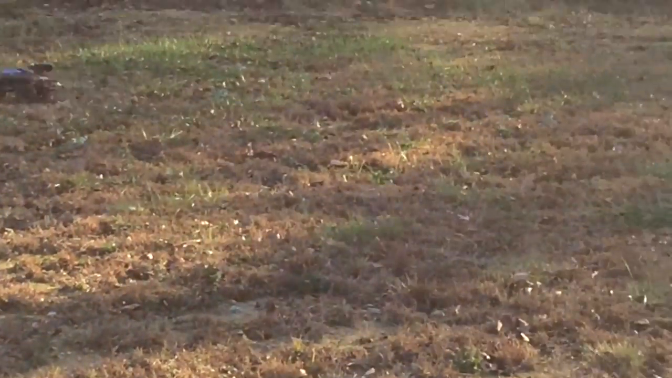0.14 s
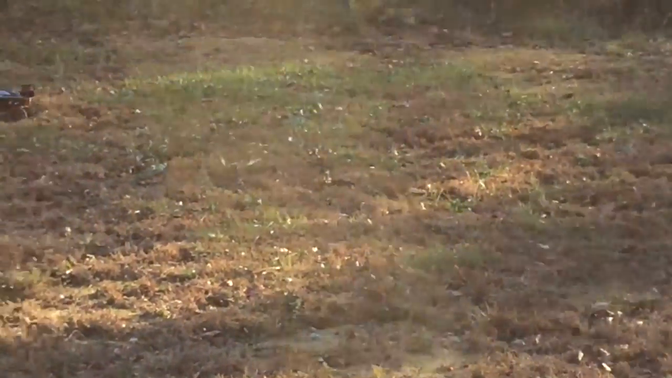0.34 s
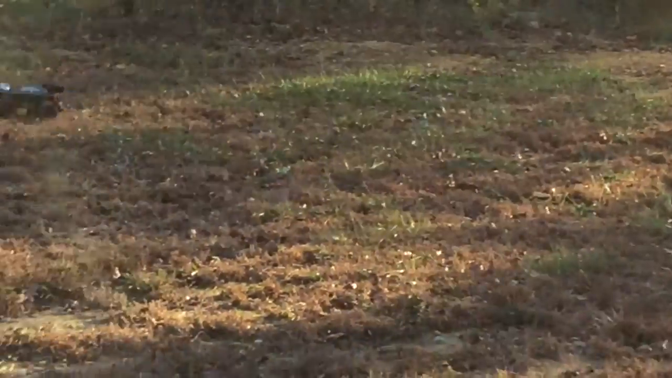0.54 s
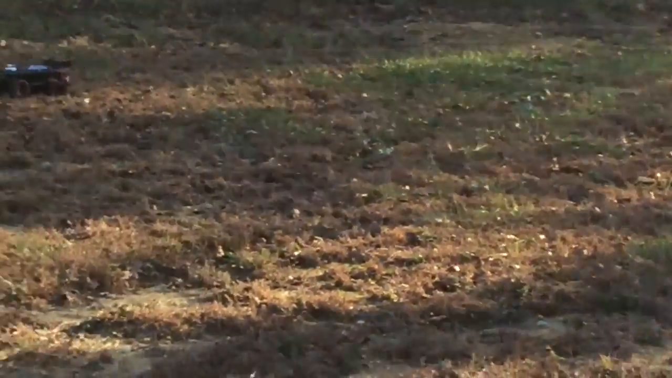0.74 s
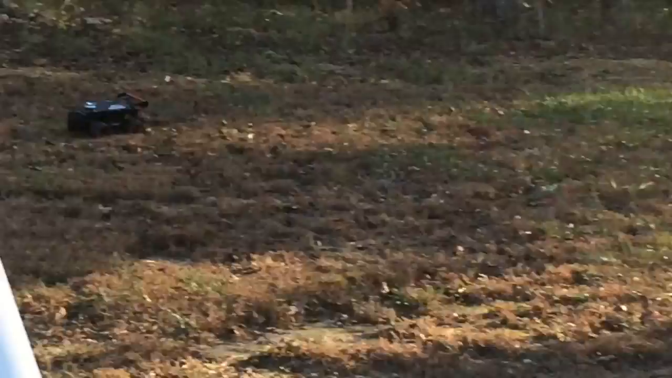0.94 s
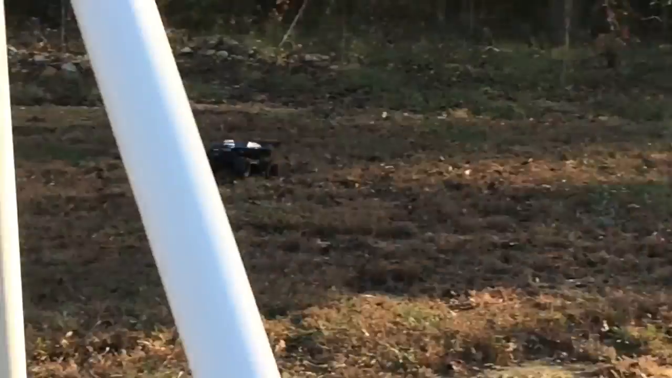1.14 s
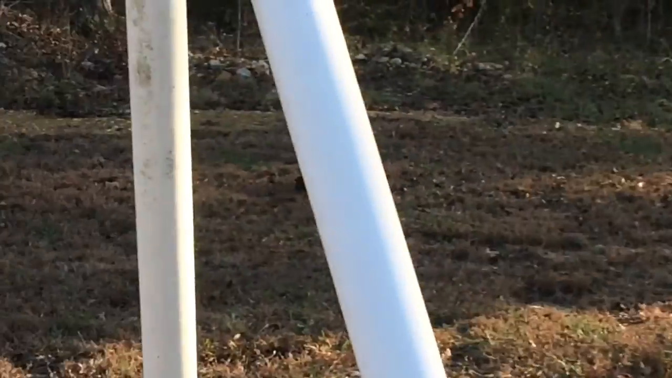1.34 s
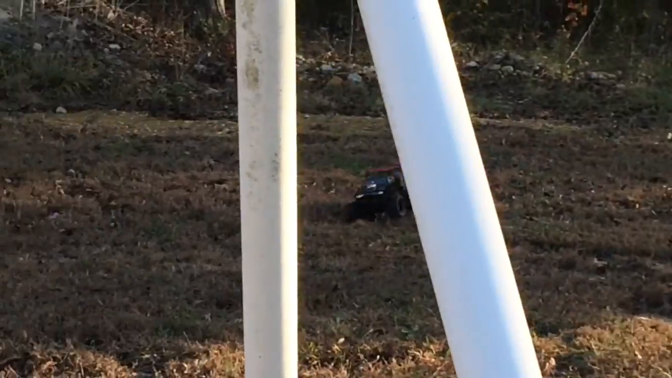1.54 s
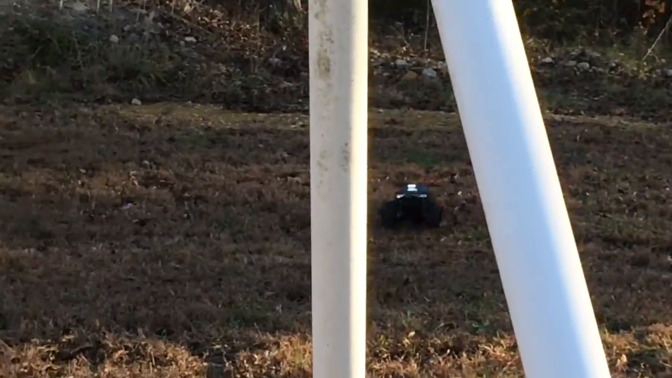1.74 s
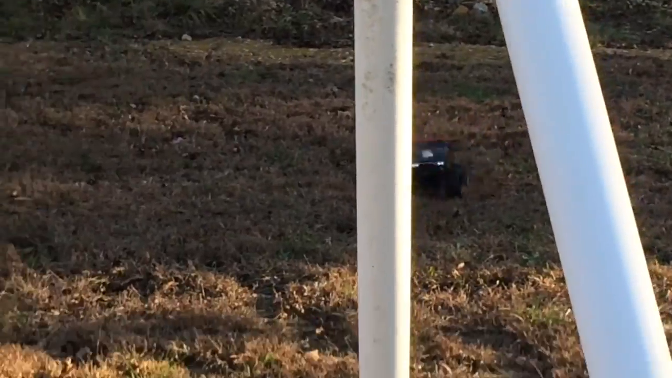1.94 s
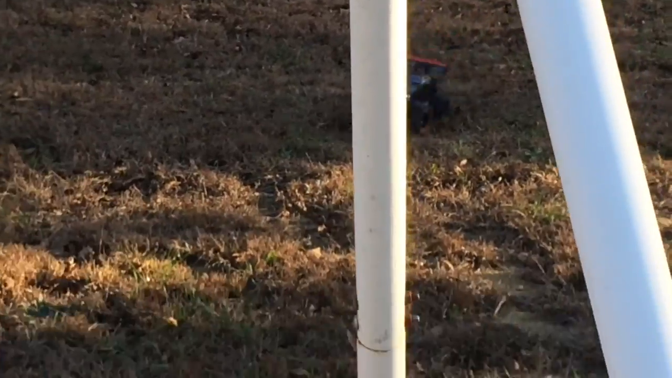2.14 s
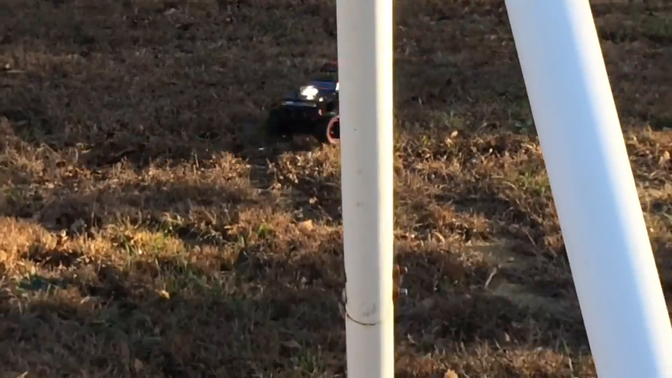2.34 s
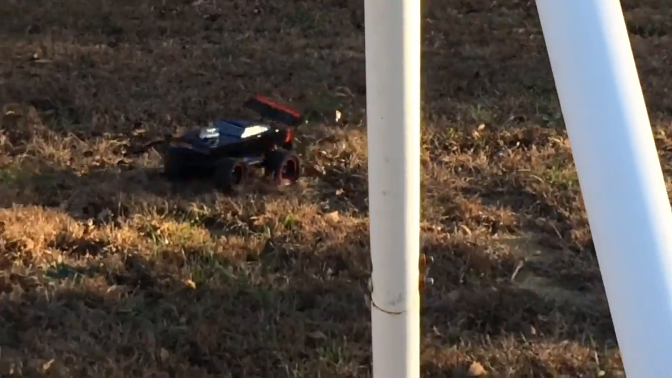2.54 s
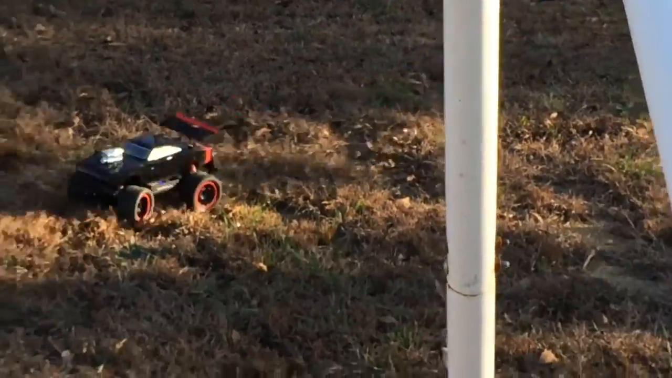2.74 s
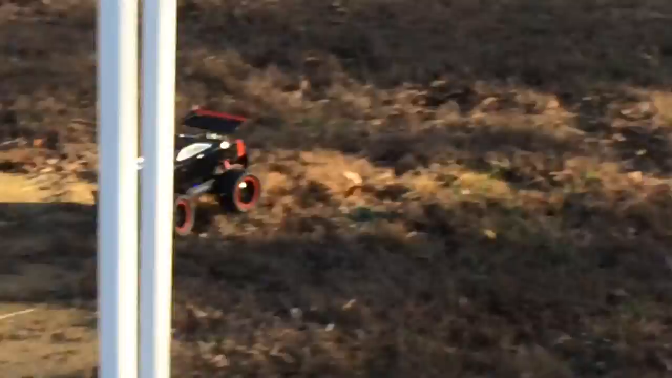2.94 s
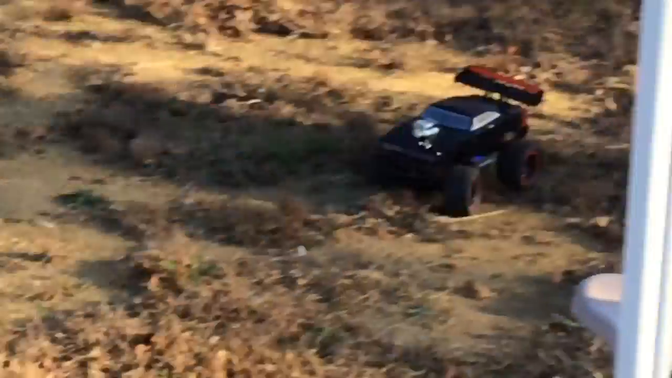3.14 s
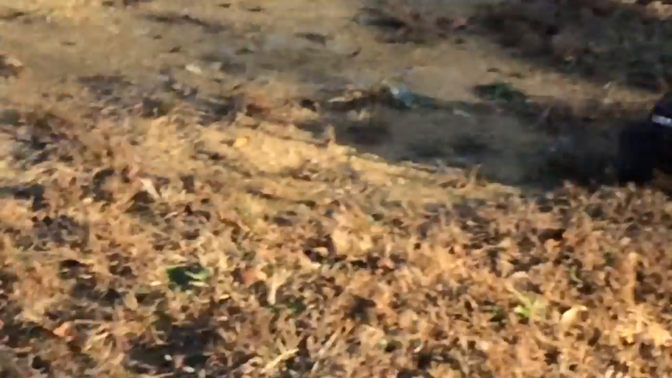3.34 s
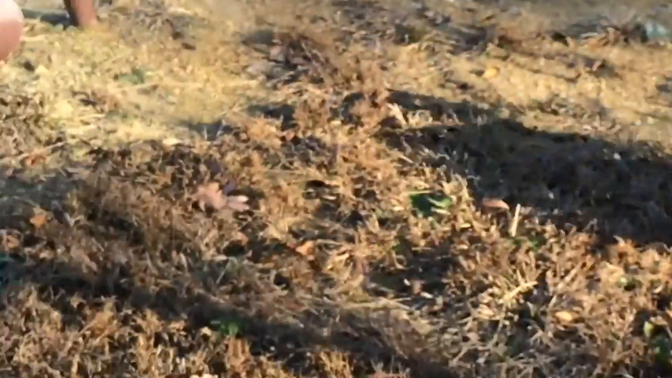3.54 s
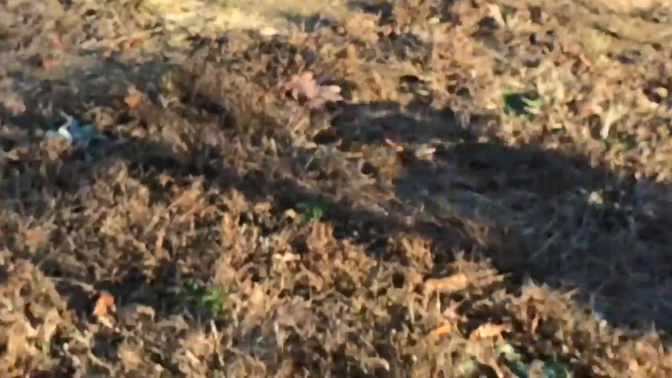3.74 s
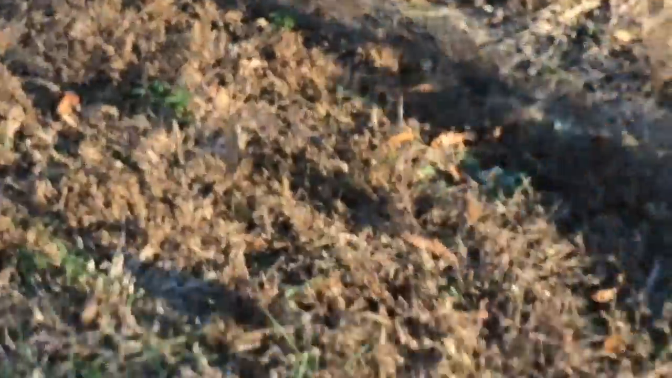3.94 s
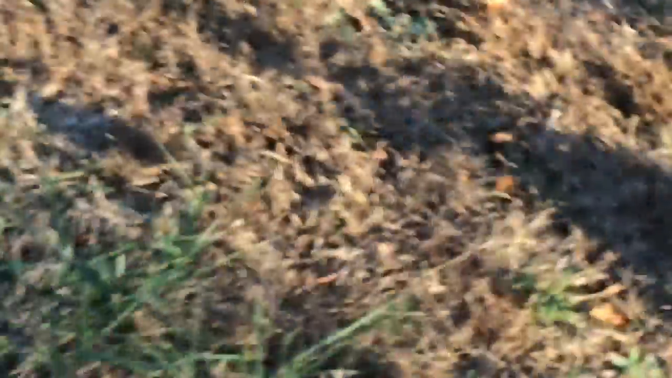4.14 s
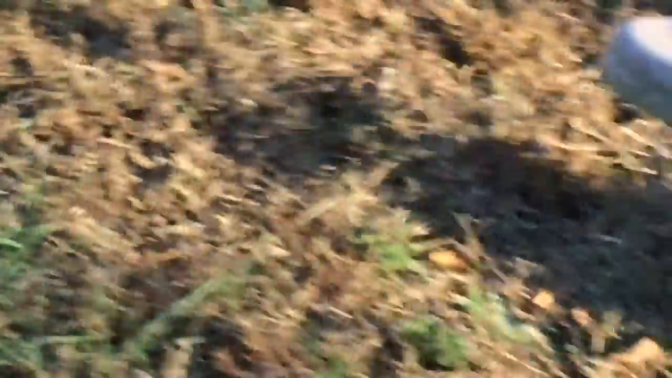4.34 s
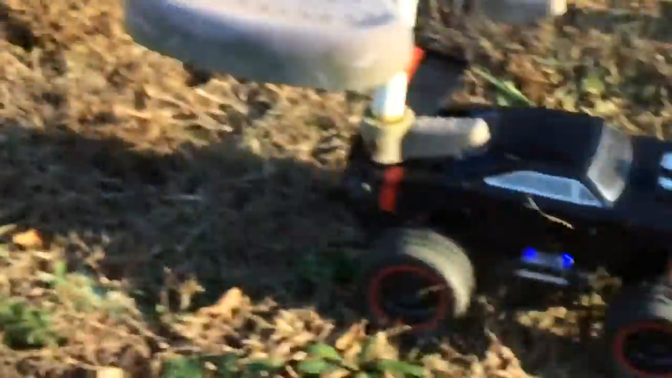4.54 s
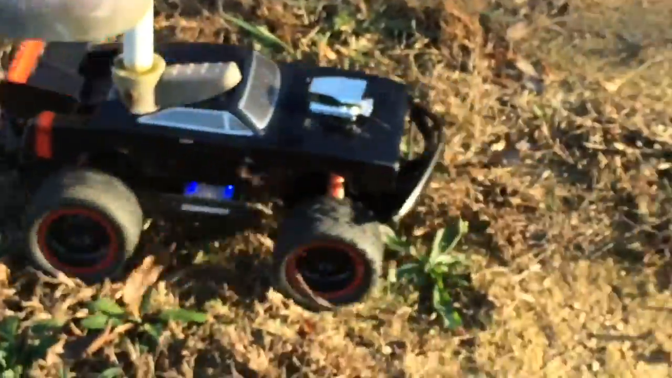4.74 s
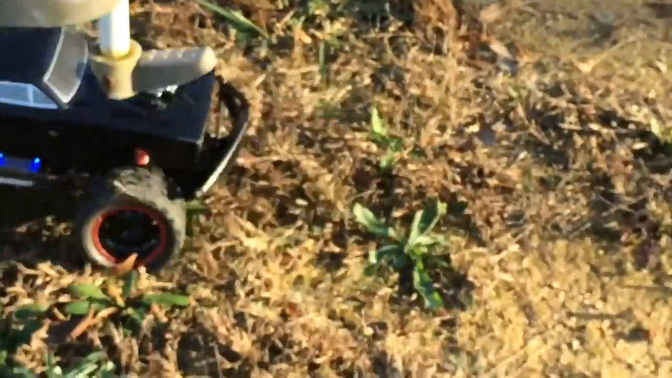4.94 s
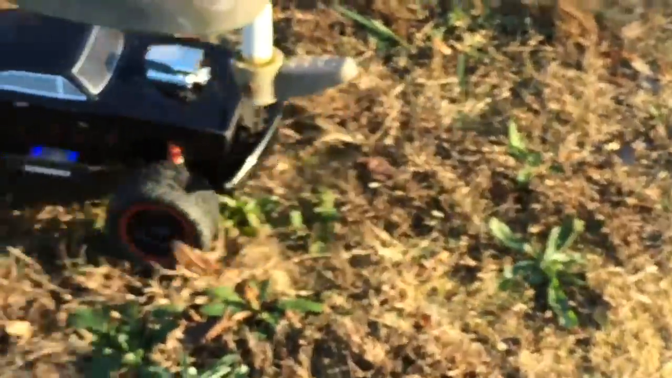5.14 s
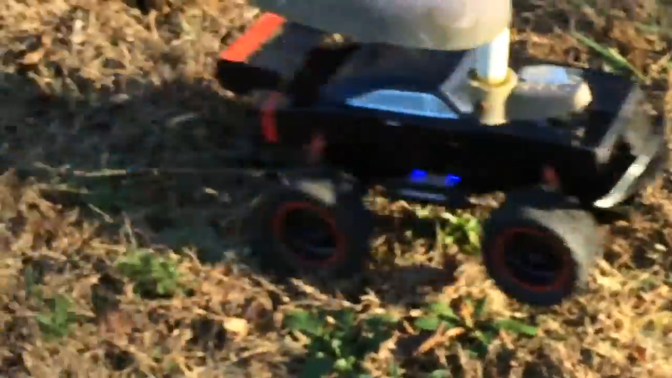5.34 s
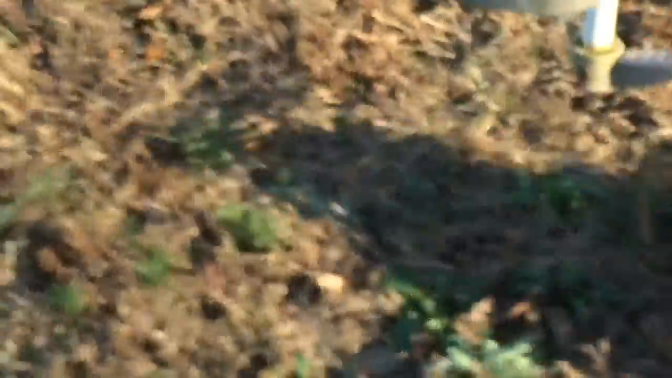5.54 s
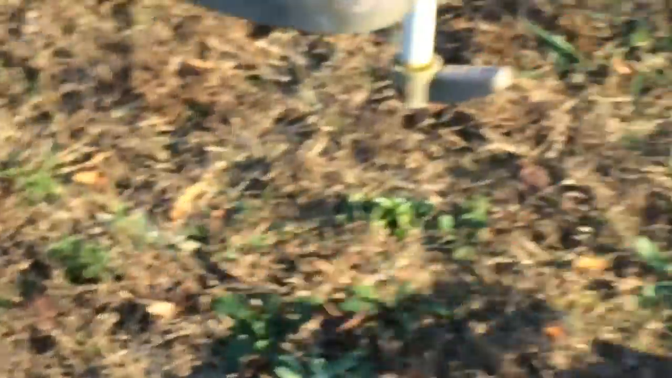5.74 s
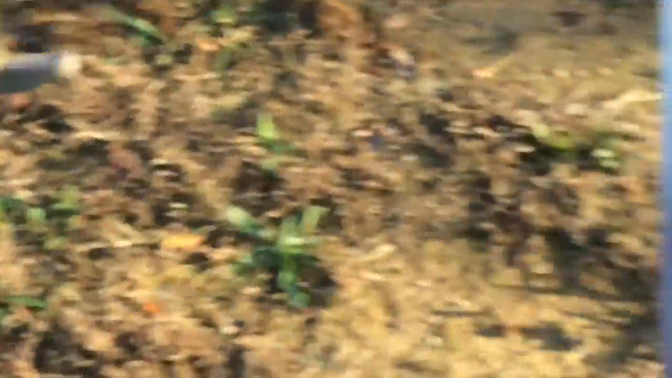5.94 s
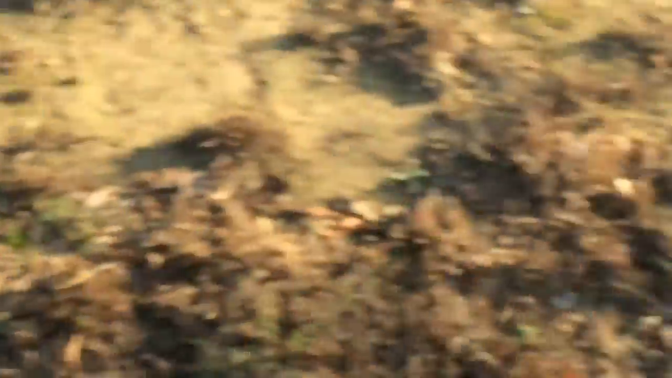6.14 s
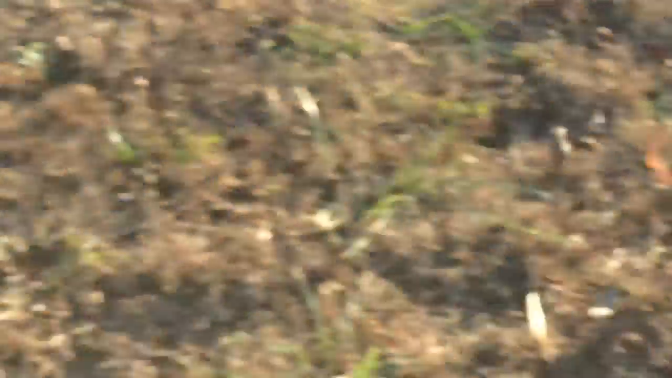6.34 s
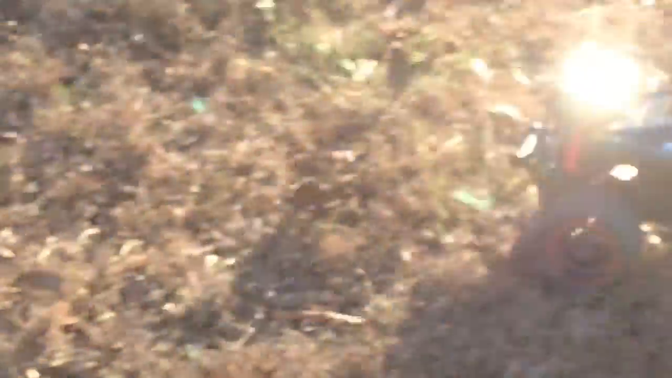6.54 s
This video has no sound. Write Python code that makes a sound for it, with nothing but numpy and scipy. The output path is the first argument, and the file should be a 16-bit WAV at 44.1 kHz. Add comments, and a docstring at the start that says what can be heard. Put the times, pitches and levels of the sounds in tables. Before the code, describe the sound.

A faint, wavering electric gear whine cuts out and restarts, then gives way to crackling grass as a toy car approaches. A brief strong whine, clatter and rolling follow. Close to the single outdoor microphone, the motor growls up and whines unevenly, stops, then bursts again louder and higher with gritty grinding. Soft yard rumble and hum lie underneath.

```python
"""A gear whine rises, sags and leaps in stop-start bursts, first far off, then close by: a battery toy
car on dry grass. The whine is tooth tones of a motor that bogs under load, over the grind of the
gearbox and dry stalks, made of coloured noise and crackle. The plastic body knocks (short hollow
rings) and clatters (gritty noise bursts). Behind lie distant yard rumble and low hum lines.
One microphone, the same signal on both channels."""
import sys
import numpy as np
from scipy import signal
from scipy.fft import rfft, irfft
from scipy.io import wavfile
from scipy.ndimage import uniform_filter1d

SR = 44100
rng = np.random.default_rng(int(sys.argv[2]) if len(sys.argv) > 2 else 0)


def int16_out(signal):
    """Quantize to a 16-bit WAV file."""
    q = np.round(np.clip(np.atleast_2d(signal).T, -1, 1) * 32767)
    wavfile.write(sys.argv[1], SR, q.astype(np.int16))


N = 290178

# Levels in the tables are settings ahead of the microphone colour.
# distant yard, spectrum shape: f/Hz, density/dB
YARD_SPECTRUM = [(15, -43), (25, -2.5), (59, -2), (156, -2.5), (228, -6), (253, -12.5), (305, -8),
                 (422, -16.5), (501, -8.5), (1500, -23), (1950, -32.5), (3300, -120)]
# distant yard, course of the rumble: t/s, level/dB
YARD_LEVEL = [(0.0, -43.5), (1.48, -41.5), (6.58, -48.5)]
# distant hum lines: f/Hz, width/Hz, level/dB, from t/s, to t/s
HUM_LINES = [(76, 12, -52, 0, 5.4), (128, 6, -48, .9, 1.4), (130, 10, -50, 4.75, 5.45),
             (156, 5, -46, 0, 2.15), (156, 8, -52, 2.25, 2.9), (315, 10, -55, 1.5, 2.0)]
# dull bumps near the microphone: t/s, relative level/dB, fall time/s
THUMPS = [(4.198, -14, 0.01), (4.239, -18, 0.048)]
# microphone colour: f/Hz, gain/dB
MIC_COLOUR = [(20, -28), (45, -2), (13500, 0), (14800, -14), (15800, -12)]
EDGE_HZ = 15700  # upper band limit

# grind of gears and tyres as the car comes, goes and stops:
# t/s, relative level/dB, treble share/dB, bass share/dB
GRIND_COURSE = [(0, -37.5, 1.5, -3), (1.451, -35, -1.2, -4), (1.68, -36, -4.5, -4.5),
                (1.85, -31.5, -5, -4.5), (2.1, -33, -3.5, -3), (2.249, -36.5, -5, -0.8), (2.45, -33, -2, 0),
                (2.9, -35, 2, -1), (3.2, -29.5, 1, 0), (3.47, -33.5, 5, 3.5), (3.6, -30, 2.5, -0.5),
                (3.655, -29, -1, -1), (3.681, -24.5, -0.5, -4), (3.74, -22, -4.5, -7),
                (3.762, -36, -1.8, 0), (4.069, -38, -5, 0), (4.29, -35, -7, 5.5), (4.345, -27, -2, 2),
                (4.55, -24.5, -2, 4.5), (4.957, -29, 0.5, 4), (5.007, -41.5, -2.5, 1.5),
                (5.23, -41.5, -3.5, 1.5), (5.332, -28.5, -8.5, -1.5), (5.43, -27.5, -5.5, -5.5),
                (5.65, -19, -5, -5.5), (5.73, -18.5, 0.5, -8.5), (5.78, -21, -10.5, -4),
                (5.85, -23, 1.5, -3.5), (5.9, -19.5, 1, -4.5), (6.06, -18, -3, -7.5), (6.106, -25, 9, -7),
                (6.14, -19.5, -5, 0), (6.18, -33.5, -1.5, 0.5), (6.47, -40, 4.5, -1.5),
                (6.58, -25, -6.5, 7)]
# colour of the grind far off: f/Hz, relative density/dB
FAR_COLOUR = [(150, -44), (250, -11), (308, 3), (420, -8), (507, -6.5), (1600, -10), (2280, -13),
              (3220, -10.5), (4240, -7.5), (6420, -10.5), (8320, -11), (9720, -12.5), (13000, -14),
              (15500, -10)]
# colour of the grind drawing near or rolling free: f/Hz, relative density/dB
COMING_COLOUR = [(150, -36.5), (250, 9), (442, -12.5), (563, -13), (809, -8), (1310, -6.5), (2020, -7.5),
                 (2900, -5.5), (4030, -8), (5600, -9), (7640, -11), (9230, -11), (12800, -13), (15500, -9)]
# colour of the grind driving close by: f/Hz, relative density/dB
CLOSE_COLOUR = [(150, -57.5), (250, -6.5), (480, -14), (900, -12), (1400, -13.5), (1950, -12.5),
                (2320, -10), (3010, -9.5), (4300, -4), (5050, -12), (5450, -14), (7200, -12), (9200, -11.5),
                (10800, -11), (13000, -14), (15500, -19.5)]
# where the car is: t/s, place (0 far, 1 nearing or rolling free, 2 close under power)
PLACE = [(1.7, 0), (2.6, 1), (4.2, 1), (4.32, 2), (4.95, 2), (5.0, 1), (5.23, 1), (5.26, 2), (6.15, 2),
         (6.19, 1)]
# gearbox case resonances: f/Hz, width/Hz, lift/dB
CASE_RESONANCES = [(778, 132, 14), (2700, 240, 0), (4240, 120, 8), (8500, 200, 5), (10730, 1150, 3)]
# scuffs of wheels and body through dry stalks swell the grind:
# t/s, lift/dB, treble change/dB, half length/s
SCUFFS = [(2.377, 4.5, -3, 0.04043), (2.701, 9, -5.5, 0.008), (2.767, 3, 0, 0.16), (2.955, 6.5, -3.5, 0.02),
          (3.145, 4, -8, 0.043), (3.242, 4.5, -4, 0.021), (3.33, 5.5, -4.5, 0.045),
          (3.406, 3.5, 0.5, 0.019), (3.54, 6, -4, 0.024), (3.91, 5, 3, 0.093), (4.032, 6, 2.5, 0.044),
          (4.123, 6.5, 0, 0.011), (4.221, 7.5, 2.5, 0.065), (5.107, 7.5, 4.5, 0.03),
          (5.273, 16.5, -6, 0.025), (5.403, 8.5, -1, 0.085), (5.557, 5.5, 4.5, 0.026),
          (5.804, 5, 6.5, 0.021), (6.275, 3, 7, 0.011), (6.396, 8.5, -1.5, 0.059)]
# the wheels hop clear of the stalks and the grind dips: t/s, level change/dB
HOPS = [(3.229, -7), (3.343, -7), (3.375, -3), (3.42, -4), (3.465, -11), (3.574, -6)]
HOP_S = .007  # half length of a hop
# bands that stand out or drop away as the car turns and the ground echoes it:
# from t/s, to t/s, f/Hz, half width/Hz, change/dB
FACING_BANDS = [(0, 2.25, 1850, 170, -7), (2.2, 2.9, 1500, 220, 4), (2.4, 3.25, 3150, 300, 4.5),
                (2.5, 3.06, 4500, 350, 5), (3.3, 3.76, 2800, 330, 5), (5.5, 5.72, 2900, 350, -4),
                (5.5, 5.68, 1750, 130, 6), (5.9, 6.06, 2200, 150, 4)]

# hollow knocks of the chassis: t/s, relative level/dB, f/Hz
KNOCKS = [(1.483, -30.5, 515.5), (2.168, -26.5, 793), (2.684, -30, 980), (2.771, -20, 790),
          (3.128, -23, 760), (3.555, -21.5, 923), (4.03, -27, 874), (4.085, -16.5, 808),
          (4.113, -29.5, 1850), (4.246, -20.5, 326), (4.463, -20, 676), (4.63, -25.5, 812),
          (4.739, -25.5, 811), (5.735, -25, 840), (6.123, -26, 1232), (6.524, -28, 843), (6.569, -28, 680)]
# clatter of body shell and stalks: t/s, relative level/dB, brightest f/Hz
CLATTER = [(2.959, -11, 4400), (3.1497, -8.5, 3370), (3.2051, -14.5, 4680), (3.2497, -10, 9110),
           (3.3524, -20, 2980), (3.3852, -11.5, 3100), (3.4323, -13.5, 2720), (3.473, -9, 3060),
           (3.669, -9.5, 2956), (3.8197, -17, 3120), (3.8658, -15.5, 3020), (3.9987, -6.5, 4000),
           (4.0327, -20, 4070), (5.471, -20, 4400), (5.7494, -7.5, 4540), (6.129, -3.5, 4970),
           (6.2729, -11, 2970)]
# single snaps of a stalk: t/s, relative level/dB, brightest f/Hz
TICKS = [(2.699, -16, 4000), (4.246, -13, 600), (5.0207, -23, 2890), (5.0406, -18.5, 6480),
         (5.1, -16.5, 7000), (5.169, -20, 9840), (5.2142, -21, 3830), (5.249, -27, 2480),
         (6.217, -16.5, 6582), (6.539, -6, 1850)]

# colour that the body gives to the whine: f/Hz, gain/dB
BODY_COLOUR = [(400, -25), (1000, -8.5), (1500, -21), (1760, -10), (2000, -12.5), (3100, -13.5),
               (4420, 3.5), (5150, -7), (5500, -46), (7550, -85), (8930, 1), (10500, -26), (13500, -38),
               (15500, -46)]
# higher multiples of the tooth rate: multiple, level/dB (odd against the whine, even against its octave)
OVERTONES = [(3, -11.5), (4, -5), (5, -12)]
TEETH = 10  # tooth-rate cycles for each turn of the shaft
# spells of throttle farther off, levels at top speed before the body colours them:
# on t/s, off t/s, first tooth rate f/Hz, top tooth rate f/Hz, spin-up time/s, whine level/dB,
# octave level/dB, lift while the load slows the motor/dB, tooth slack/rad per multiple,
# rms speed flutter (share of speed)
SPELLS = [(0, 1.62, 2855, 2823, 0.14, -48, -46, 5, .09, .008),
          (1.811, 2.14, 2976, 2855, 0.092, -37, -42, 3, 0.08, .004),
          (2.947, 3.0, 2560, 2550, 0.1166, -53.5, -26, 13, 0.1282, 0.09),
          (3.341, 3.75, 2932, 2925, 0.13, -27, -46, 3, .33, 0.022)]
# tufts and ruts that load the wheels: t/s of lowest speed, speed lost (0-1), fall/s, recovery/s,
# whine change/dB, octave change/dB
SAGS = [(.025, 0.32, 0.052, 0.1, -2, 15.5), (.09, 0.26, 0.068, 0.072, 7, 10),
        (.25, 0.2, 0.04166, 0.024, -4, 1), (.295, 0.32, 0.023, 0.012, 9.5, 12.5),
        (.6, 0.28, 0.028, 0.04, 1, 7.5), (1.036, 0.28, 0.028, 0.03, 9, 9.5),
        (1.194, .26, 0.03234, .018, 18, 12), (1.38, 0.18, 0.029, 0.035, 15, 10),
        (1.578, 0.28, 0.019, 0.028, 20, 8), (1.85, 0.14, 0.02, 0.083, 5.5, 0),
        (2.105, 0.21, 0.03, 0.046, 5.5, -8), (2.975, 0.16, 0.026, 0.33, 7, -3),
        (3.34, .08, 0.0184, 0.031, 2.74, -3), (3.465, 0.17, 0.07097, 0.05, 6, 0),
        (3.544, 0.13, 0.014, 0.024, 13.5, -10.5)]
QUICK_S = .045  # after a load that lets go faster than this, the strain in the whine eases sooner
DB_PER_OCTAVE = 9.5  # the whine grows louder with speed
BRAKE_OCTAVES_PER_S = 24  # rate of slowing that gives three quarters of the braking lift
# throttle closed: decay time of the speed, extra fade of the whine, time until it is cut
COAST_S, COAST_DB_PER_S, COAST_HEARD_S = 0.31, 380., 0.11
# two bursts close by, speed sagging and leaping with the load:
# t/s, tooth rate f/Hz, whine level/dB, octave level/dB
FIRST_BURST = [(4.251, 684, -37, -49), (4.28, 992, -56, -52), (4.312, 1136, -42, -36),
               (4.346, 1766, -45, -35), (4.388, 2460, -27.5, -32), (4.418, 2523, -24.5, -33),
               (4.441, 2261, -33, -38), (4.456, 2538, -30, -27), (4.47, 2014, -31, -21),
               (4.483, 1879, -35, -42), (4.51, 2093, -38, -23), (4.524, 2253, -33, -36),
               (4.546, 2433, -31, -35), (4.572, 2494, -27.5, -27), (4.598, 2035, -36, -20),
               (4.612, 2320, -33, -36), (4.65, 2545, -32, -34), (4.669, 2407, -24, -26),
               (4.691, 2270, -41, -32), (4.704, 2410, -31, -33), (4.728, 2464, -30.5, -34),
               (4.752, 2438, -30.5, -30), (4.766, 2240, -27, -21.5), (4.78, 2380, -31.5, -28),
               (4.846, 2456, -31, -31), (4.88, 2306, -35, -33), (4.925, 1426, -52.5, -39)]
# the second burst: t/s, tooth rate f/Hz, whine level/dB, octave level/dB
SECOND_BURST = [(5.32, 909, -56, -56), (5.33, 900, -35, -48), (5.358, 1301, -38, -37),
                (5.391, 1589, -35, -42), (5.402, 1770, -26, -27), (5.416, 1881, -31.5, -21.5),
                (5.466, 1716, -24, -28), (5.474, 1607, -40, -53.5), (5.495, 1013, -35, -51),
                (5.512, 1483, -49, -42), (5.524, 1760, -23.5, -27), (5.538, 2042, -42, -15.5),
                (5.55, 2220, -23, -20.5), (5.566, 2238, -27, -13), (5.578, 1850, -33, -31),
                (5.588, 1542, -43, -39), (5.606, 1677, -35, -35), (5.635, 2109, -38, -14),
                (5.659, 1962, -40, -22), (5.693, 2430, -34, -22), (5.712, 2665, -27, -40),
                (5.74, 2812, -27, -44), (5.75, 2428, -36, -33), (5.76, 1780, -35, -40),
                (5.774, 1714, -33, -53), (5.79, 2280, -54, -26), (5.808, 2402, -39, -30),
                (5.83, 2952, -41, -55), (5.886, 2956, -22.5, -36), (5.904, 2708, -28.5, -47),
                (5.932, 2884, -33, -34), (5.956, 2209, -31, -27), (5.986, 2464, -39, -22.5),
                (6.012, 1932, -34, -19), (6.08, 2810, -28.5, -47), (6.114, 3080, -21, -50),
                (6.14, 2886, -42, -42)]
# upper multiples of each burst, before the body colours them: third level/dB, fourth and fifth level/dB,
# treble change/dB (third above 6 kHz; minus half of it on the fourth above 6 kHz and all of the fifth),
# tooth slack/rad per multiple
BURST_OVERTONES = [(-32, -33, 0, .16), (-22, -33, -14, .1)]
BITE_HZ = 1300  # below this tooth rate the upper multiples of a burst fade


def amp(db):
    """Decibels to gain."""
    return 10 ** (np.asarray(db) / 20)


def evened(x):
    """Scales to rms 1."""
    return x / np.sqrt(np.mean(x ** 2) + 1e-20)


def read(points, hz):
    """Reads a spectrum on a log-frequency axis."""
    f, value = np.transpose(points)
    return np.interp(np.log(hz + 1), np.log(f + 1), value)


def add(mix, s, sound):
    """Mixes a sound in at s seconds."""
    part = mix[round(s * SR):][:len(sound)]
    part += sound[:len(part)]


def wobble(count, size):
    """Smooth random wander of rms 1."""
    once = uniform_filter1d(rng.standard_normal(count), size)
    return evened(uniform_filter1d(once, size))


def resonate(x, hz, width):
    """One resonance of gain 1: shifts its pitch to zero, smooths, and shifts back."""
    turn = np.exp(2j * np.pi * hz * np.arange(len(x)) / SR)
    r = np.exp(-np.pi * width / SR)
    return 2 * (turn * signal.lfilter([1 - r], [1, -r], x / turn)).real


def gate(t, start, end, size):
    """A switch from 0 to 1 and back, with edges smoothed over size steps."""
    return uniform_filter1d(1. * (t >= start) * (t <= end), size=size)


def yard(steady=10.0):
    """Far-off rumble of shaped noise, with hum lines, mostly steady tone, that come and go."""
    hz, t = np.fft.rfftfreq(N, 1 / SR), np.arange(N) / SR
    rumble = evened(irfft(rfft(rng.standard_normal(N)) * amp(read(YARD_SPECTRUM, hz)), N))
    out = amp(np.interp(t, *np.transpose(YARD_LEVEL))) * rumble
    for f, width, db, start, end in HUM_LINES:
        rough = evened(resonate(rng.standard_normal(N), f, width))
        hum = evened(steady * np.sin(2 * np.pi * f * t) + rough)
        out += amp(db) * gate(t, start, end, size=4000) * hum
    return out


def thumps():
    """Dull bumps close to the microphone: low noise with no ring."""
    out, t = np.zeros(N), np.arange(4000) / SR
    for s, db, length in THUMPS:
        push = rng.standard_normal(len(t))
        low = resonate(resonate(push, 310.0, 1000.0), 300., 2300.0)
        low = evened(low - uniform_filter1d(low, size=500))  # takes out the deepest rumble
        envelope = np.minimum(t / 0.001182, 1) * np.exp(-(t / length) ** 2)
        add(out, s, .5 * amp(db) * envelope * low)
    return out


def stalk_noise(crackle_db=5.5, crackles_per_s=2500., crackle_share=0.31):
    """Dry stalks under the car: steady noise mixed with random clicks of uneven strength."""
    strength = amp(crackle_db * np.minimum(rng.exponential(1, N), 3))
    clicks = strength * (rng.random(N) < crackles_per_s / SR) * rng.choice([-1, 1], N)
    return (1 - crackle_share) * rng.standard_normal(N) + crackle_share * evened(clicks)


def grind_level(t):
    """Level and band shares of the grind: scuffs swell it, hops off the stalks dip it."""
    s, *columns = np.transpose(GRIND_COURSE)
    level_db, treble_db, bass_db = (np.interp(t, s, c) for c in columns)
    at, lift_db, edge_db, length = np.transpose(SCUFFS)
    scuff = np.exp(-((t[:, None] - at) / length) ** 2)
    at, hop_db = np.transpose(HOPS)
    hop = np.exp(-((t[:, None] - at) / HOP_S) ** 2)
    return level_db + scuff @ lift_db + hop @ hop_db, treble_db + scuff @ edge_db, bass_db


def grind_colour(hz, t, treble_db, bass_db):
    """Spectrum of the grind over time: distance of the car, case resonances, the way it faces."""
    colour = np.outer(hz < 1500, bass_db) + np.outer(hz > 5500, treble_db)
    place = np.interp(t, *np.transpose(PLACE))
    for k, points in enumerate((FAR_COLOUR, COMING_COLOUR, CLOSE_COLOUR)):
        colour += np.outer(read(points, hz), np.maximum(1 - abs(place - k), 0))
    for f, width, db in CASE_RESONANCES:
        colour += db / (1 + (2 * (hz[:, None] - f) / width) ** 2)
    for start, end, f, width, db in FACING_BANDS:
        band = np.exp(-((hz - f) / width) ** 2)
        colour += db * np.outer(band, gate(t, start, end, size=60))
    return colour


def grind(flicker_db=1.5, patchy_db=2.5):
    """Noise and crackle of dry stalks, coloured by where the car is, flickering at random in level."""
    hz, t, z = signal.stft(stalk_noise(), SR, nperseg=256, noverlap=192)
    level_db, treble_db, bass_db = grind_level(t)
    colour = grind_colour(hz, t, treble_db, bass_db)
    patches = uniform_filter1d(rng.standard_normal(z.shape), size=2, axis=0)
    patches = evened(uniform_filter1d(patches, size=14, axis=1))
    # a random flicker moves all bands together, patches only a few
    flicker = wobble(len(t), size=7)
    z = z * amp(colour + level_db + 11.0 + flicker_db * flicker + patchy_db * patches)
    return signal.istft(z, SR, nperseg=256, noverlap=192)[1][:N]


def knocks(thud=0.78, t60=0.075, rise=0.0039):
    """Hollow chassis knocks: a short decaying ring with a broad puff of noise about its pitch."""
    out, t = np.zeros(N), np.arange(6000) / SR
    for s, db, hz in KNOCKS:
        puff = evened(resonate(rng.standard_normal(len(t)), hz, 270.0))
        ring = np.sin(2 * np.pi * hz * t) + thud * puff
        add(out, s, amp(db - 60 * t / t60) * np.minimum(t / rise, 1) * ring)
    return out


def clatter(rows, length, rise, snap, wide=0.5, grit_db=1.5):
    """Plastic or a stalk struck: a quick gritty burst of noise, brightest at one pitch, broad-edged."""
    out, t = np.zeros(N), np.arange(3000) / SR
    for s, db, hz in rows:
        grit = amp(grit_db * wobble(len(t), size=40))
        noise = evened(rng.standard_normal(len(t)) * grit)
        tone = evened(resonate(noise, hz, 520.0)) + wide * noise + snap * np.sin(2 * np.pi * hz * t)
        envelope = np.minimum(t / rise, 1) * np.exp(-(t / length) ** 2)
        add(out, s, 0.27 * amp(db) * envelope * tone)
    return out


def teeth(hz, levels_db, slack, beat=0.5, waver_db=2.5, rasp=0.3, shaft_db=-24.5):
    """Tooth tones beat 1 and 3 times a turn of an off-centre shaft, each wavering at random in level."""
    count = len(hz)
    tooth = 2 * np.pi * np.cumsum(hz) / SR
    shaft = tooth / TEETH
    out = amp(levels_db[0] + shaft_db) * np.sin(shaft)
    for k, db in enumerate(levels_db, start=1):
        level = amp(db + waver_db * wobble(count, size=400)) * (k * hz < EDGE_HZ)
        turning = np.cos(shaft + k) + np.cos(3 * shaft + wobble(count, size=200))
        uneven = 1 + beat * turning + rasp * wobble(count, size=40)
        play = slack * k * wobble(count, size=30)  # loose teeth meet a little early or late
        out += level * uneven * np.sin(k * tooth + play)
    return np.sqrt(2) * out * signal.windows.tukey(count, 600 / count)


def motor(on, off, first_hz, top_hz, spin, whine_db, octave_db, brake_db, ease=1.5, round_off=1.3):
    """Speed climbs to its top, sags under the heaviest load of the moment, and coasts down."""
    t = np.arange(on, off + COAST_HEARD_S, 1 / SR)
    loads = [row for row in SAGS if on <= row[0] <= off + .01]
    s, lost, fall, back, first_db, second_db = (c[:, None] for c in np.transpose(loads))
    near = np.exp(-np.where(t < s, (s - t) / fall, (t - s) / back) ** round_off)
    load = lost * near
    past = np.maximum(t - off, 0)
    free_hz = top_hz + (first_hz - top_hz) * np.exp(-(t - on) / spin)
    hz = free_hz * (1 - load.max(0)) * np.exp(-past / COAST_S)
    level_db = DB_PER_OCTAVE * np.log2(hz / top_hz) - COAST_DB_PER_S * past
    slowing = -np.gradient(np.log2(hz), t)  # octaves per second
    level_db += brake_db * np.tanh(slowing / BRAKE_OCTAVES_PER_S) * (t < off)
    strain = near ** np.where((t > s) & (back < QUICK_S), ease, 1.0)
    heaviest = load.argmax(0), np.arange(len(t))
    first = whine_db + level_db + (first_db * strain)[heaviest]
    octave = octave_db + level_db + (second_db * strain)[heaviest]
    return t, hz, first, octave


def whine(spell):
    """A spell farther off: odd multiples follow the whine, even ones its octave, coloured by the body."""
    *drive, slack, flutter = spell
    t, *columns = motor(*drive)
    hz, first_db, octave_db = (uniform_filter1d(c, size=300) for c in columns)
    hz = hz * (1 + flutter * wobble(len(t), size=120))
    levels_db = []
    for k, db in [(1, 0), (2, 0)] + OVERTONES:
        followed = first_db if k % 2 else octave_db
        levels_db.append(db + followed + read(BODY_COLOUR, k * hz))
    return t[0], teeth(hz, levels_db, slack)


def burst(rows, third_db, fourth_db, treble_db, slack, flutter=0.0056):
    """A burst close by: upper multiples flare as they sweep through the body's resonances."""
    s, *columns = np.transpose(rows)
    t = np.arange(s[0], s[-1], 1 / SR)
    hz, first_db, octave_db = (uniform_filter1d(np.interp(t, s, c), size=200) for c in columns)
    hz = hz * (1 + flutter * wobble(len(t), size=120))
    third = third_db + read(BODY_COLOUR, 3 * hz) + treble_db * (3 * hz > 6000)
    fourth = fourth_db + read(BODY_COLOUR, 4 * hz) - .5 * treble_db * (4 * hz > 6000)
    fifth = fourth_db + read(BODY_COLOUR, 5 * hz) - .5 * treble_db
    fade_db = 2 * DB_PER_OCTAVE * np.minimum(np.log2(hz / BITE_HZ), 0)
    upper = [db + fade_db for db in (third, fourth, fifth)]
    return t[0], teeth(hz, [first_db, octave_db] + upper, slack, waver_db=2.0, rasp=.25)


def scene():
    """Yard, car body and gear whine all reach one microphone."""
    mix = yard() + thumps() + grind() + knocks()
    mix += clatter(CLATTER, length=0.012, rise=0.0063, snap=0.)
    mix += clatter(TICKS, length=0.0021, rise=0.00063, snap=0.72)
    for spell in SPELLS:
        add(mix, *whine(spell))
    for rows, overtones in zip((FIRST_BURST, SECOND_BURST), BURST_OVERTONES):
        add(mix, *burst(rows, *overtones))
    return np.array([mix, mix])


def record(dry):
    """Microphone colour, then the band limit."""
    mic_gain = amp(read(MIC_COLOUR, np.fft.rfftfreq(N, 1 / SR)))
    coloured = irfft(rfft(dry) * mic_gain, N)
    low_pass = signal.firwin(511, EDGE_HZ, window=("kaiser", 9), fs=SR)
    return signal.oaconvolve(coloured, low_pass[None], "same")


dry = scene()
out = record(dry)
int16_out(out)
```